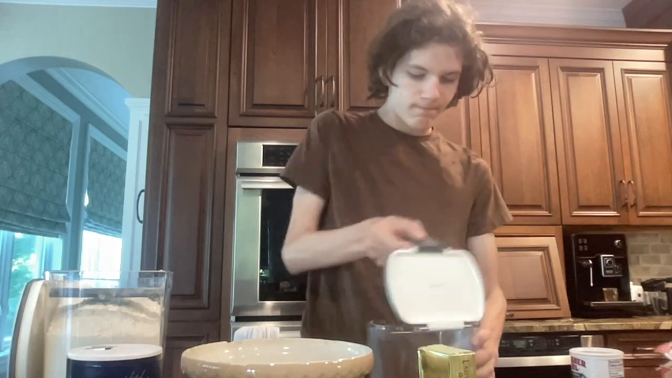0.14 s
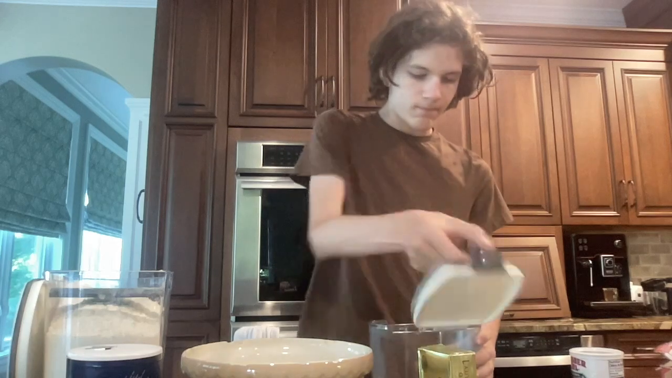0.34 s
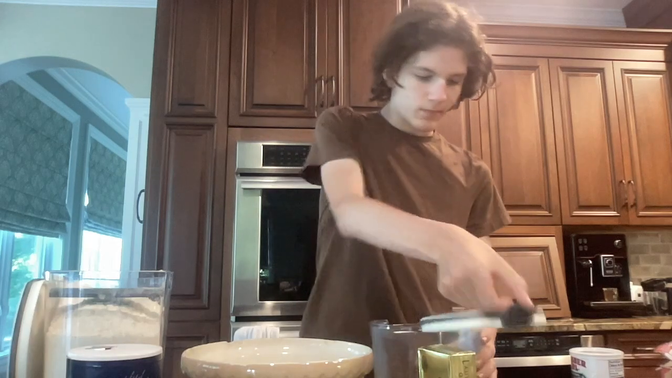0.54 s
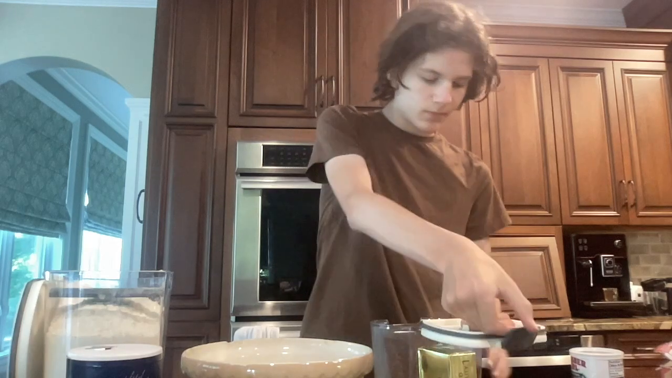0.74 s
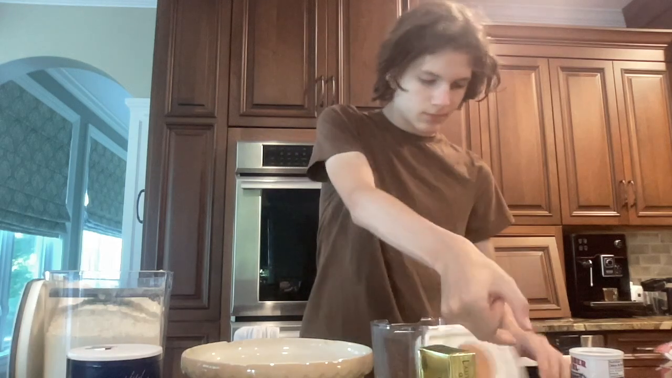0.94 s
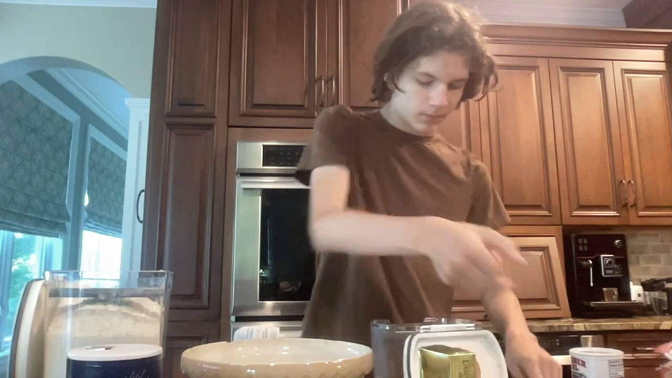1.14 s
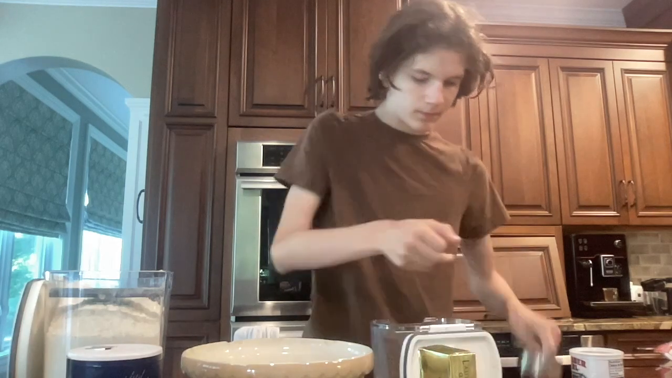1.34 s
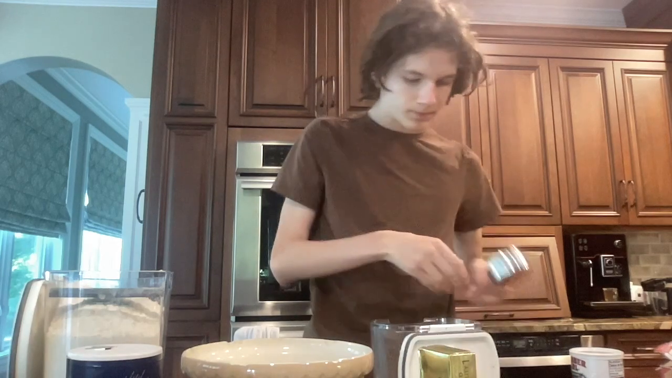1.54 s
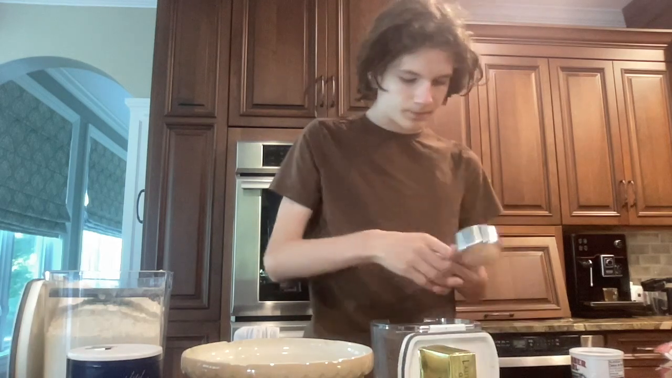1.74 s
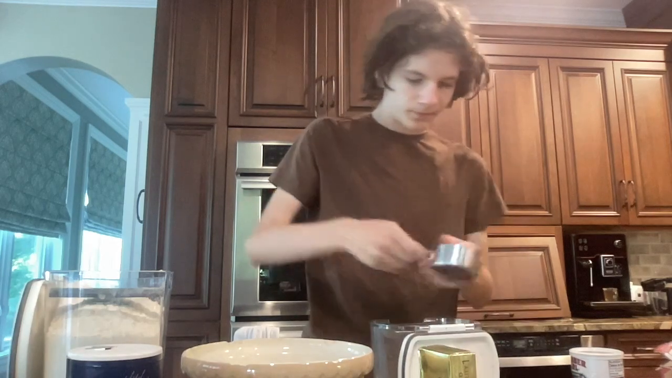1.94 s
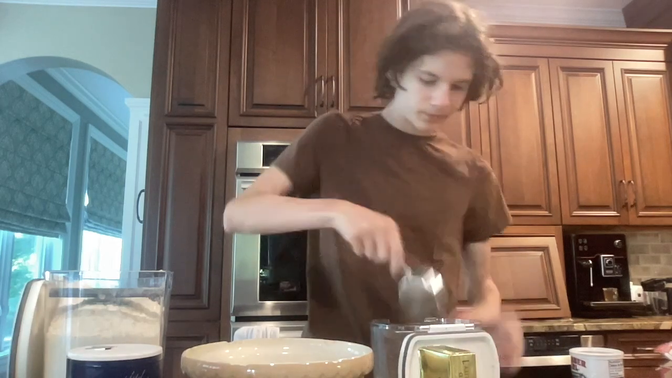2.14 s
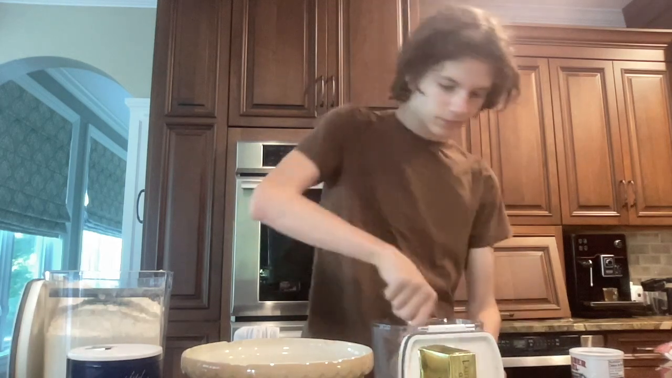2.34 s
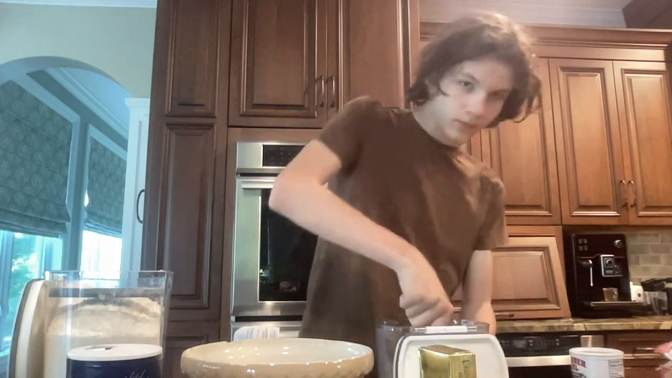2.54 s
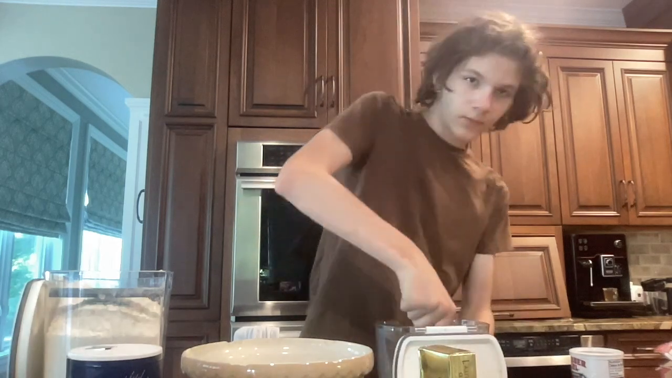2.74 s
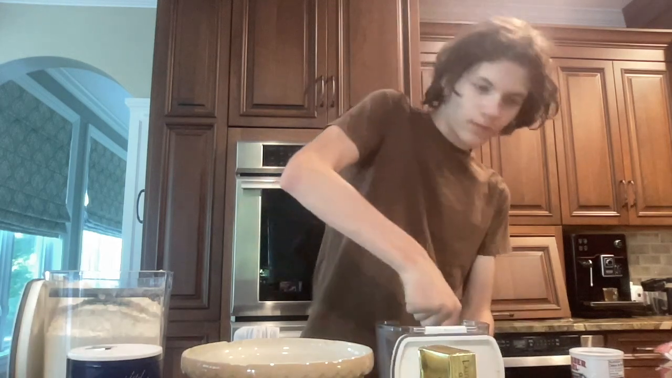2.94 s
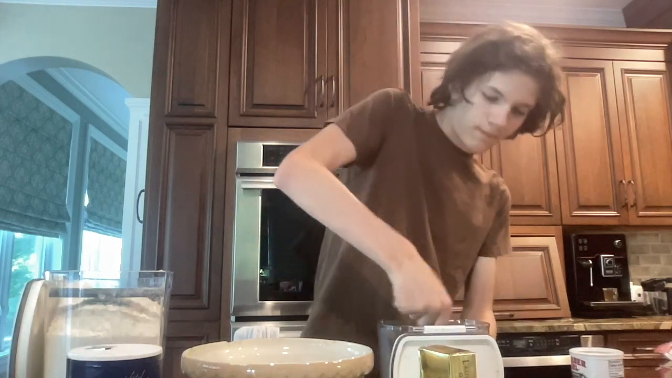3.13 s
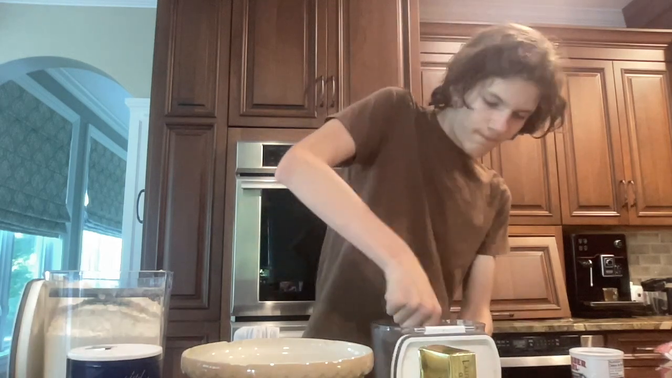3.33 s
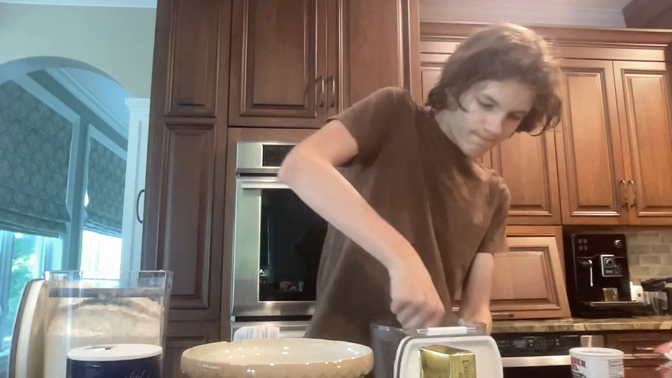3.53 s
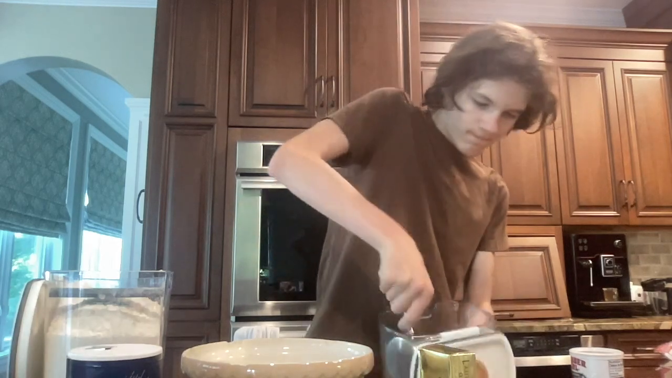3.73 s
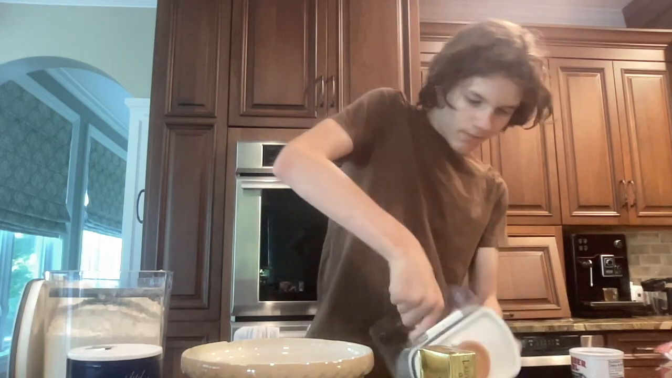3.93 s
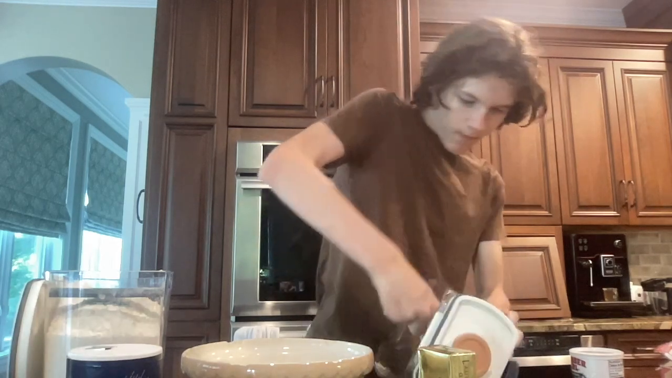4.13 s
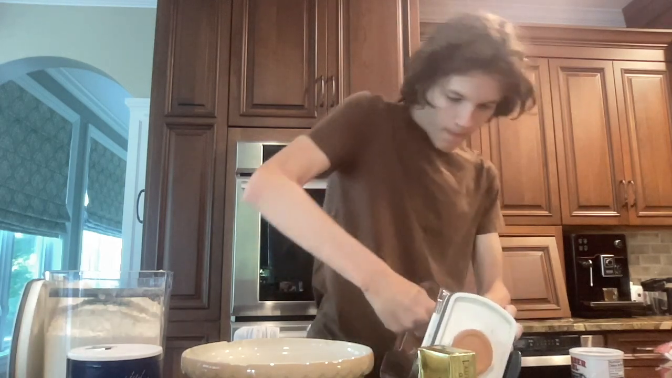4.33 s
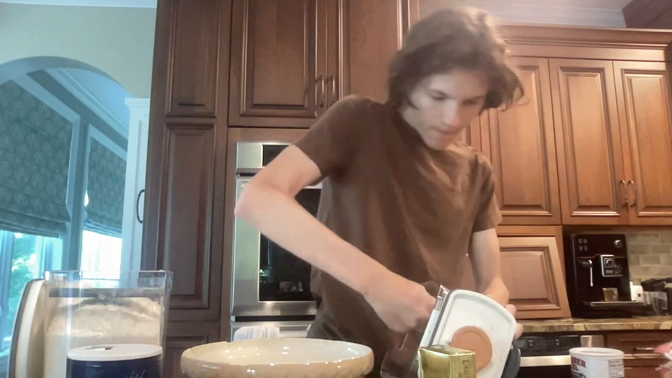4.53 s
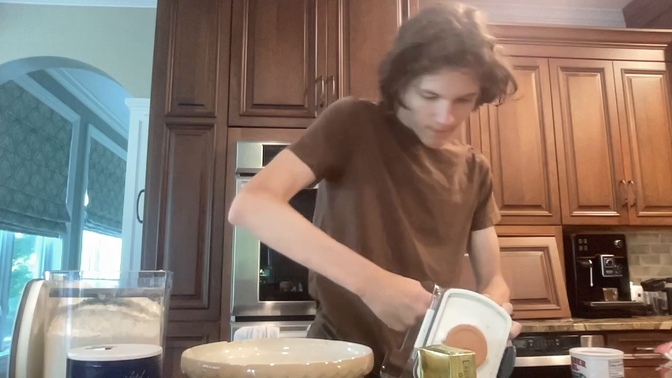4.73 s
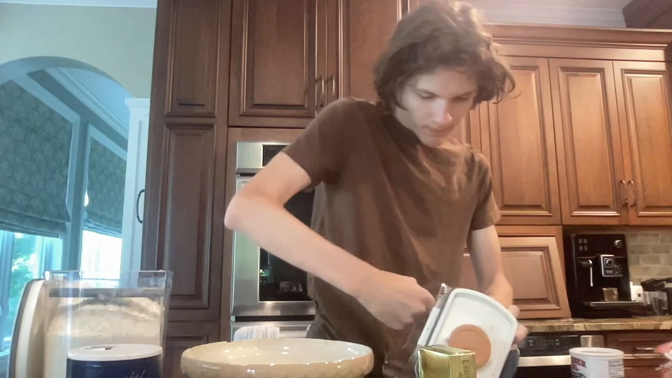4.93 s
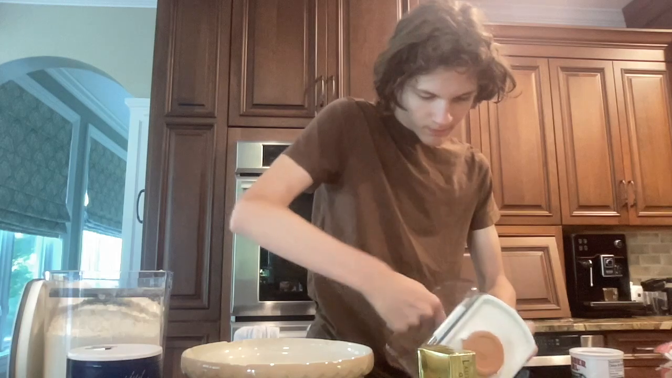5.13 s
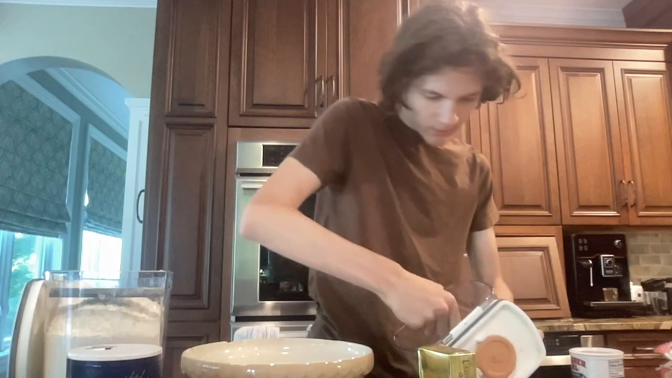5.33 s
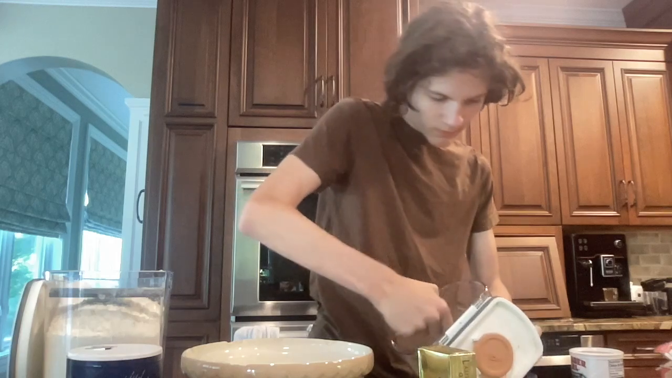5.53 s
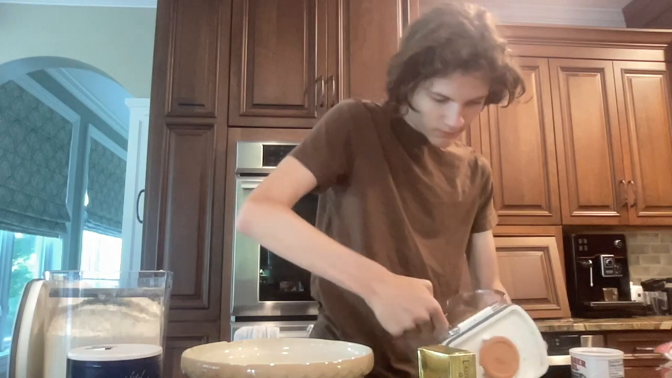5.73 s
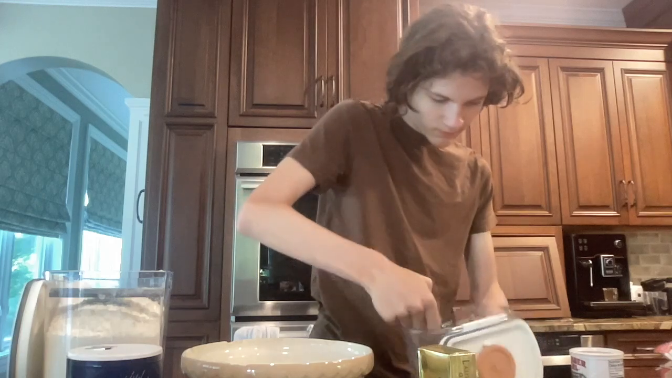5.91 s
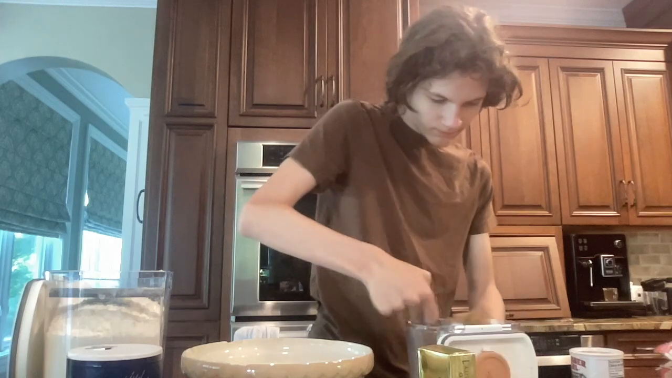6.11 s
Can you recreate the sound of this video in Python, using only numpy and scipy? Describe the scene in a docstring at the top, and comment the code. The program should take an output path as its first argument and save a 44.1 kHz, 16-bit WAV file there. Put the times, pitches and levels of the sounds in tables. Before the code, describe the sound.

Very quiet room air and a faint low hum lie beneath close handling sounds on a kitchen counter. Right at the start, a few hollow plastic knocks with a low counter thud mark the lid coming off, with another at 0.2 s and a weaker one at 0.35. After a near pause, the lid lands around 1.0-1.15 s in a rapid, loud, hard clatter, with a smaller clack at 1.37. From 1.6 to 2.15 s a steel cup clinks softly in the hand. It strikes the tub with a strong hollow knock at 2.3, then gives muted clinks and short gritty scrapes until 3.7, where a tiny high squeak and another loud knock occur. From 4 to 5.1 s sugar slides faintly in the tipped tub. Sparse small scrapes and bumps follow, ending with a heavier scrape and thunk near 6.1 s. Each impact has a short, lively room tail.

```python
"""Over still room air and faint hum, the lid is pulled off a plastic sugar tub and put down with a clatter:
noise and impulses excite wall resonances, and decaying cosines give the hollow tub and the counter.
A steel measuring cup then rattles in the hand, knocks into the tub, squeaks as a wavering sine and scrapes
through the sugar as filtered grains; the tub is tipped, the sugar slides, and the tub is set back.
A lively kitchen answers with surface echoes and a diffuse tail of decaying noise."""
import sys
import numpy as np
from scipy import signal
from scipy.fft import rfft, irfft, next_fast_len
from scipy.io import wavfile
from scipy.ndimage import map_coordinates

SR = 44100
rng = np.random.default_rng(int(sys.argv[2]) if len(sys.argv) > 2 else 0)


def persist_wave(psi):
    """Save psi, clipped to +-1, as 16-bit WAV."""
    counts = np.round(np.clip(psi, -1, 1) * 32767).astype(np.int16)
    wavfile.write(sys.argv[1], SR, np.atleast_2d(counts).T)


N = 272097

# Spectrum of still room air. Each row: frequency in Hz, relative level in dB.
AIR_SPECTRUM = [(25, -4), (60, -5), (130, -5.5), (220, -9), (450, -5.5), (700, -19.5), (1200, -31.5),
                (2200, -27.5), (4000, -36), (8000, -38.5), (11000, -43.5), (16000, -46)]

# Scraping strokes of cup and tub. Each row: centre in seconds, half length in seconds,
# pressure in dB, bite (extra grit) in dB.
STROKES = [(0.0, 0.021, -51.5, 3), (1.273, 0.011, -53, 15.5), (1.874, 0.015, -73, 6),
           (1.97, 0.017, -70, 2.5), (2.771, 0.043, -55, -2), (2.86, 0.025, -54, 13.5),
           (3.004, 0.041, -55, -10), (3.113, 0.038, -54.5, -1), (3.29, 0.063, -61.5, -1),
           (3.662, 0.055, -53, 1.5), (4.226, .025, -64.5, 13), (4.486, .03, -63, 9.5),
           (5.194, 0.026, -55.5, 3), (5.31, 0.019, -75.5, 25), (5.41, .035, -66, -3),
           (5.658, 0.023, -65, 15.5), (5.93, 0.12, -70, -6.5), (6.095, 0.032, -31.5, -6)]
# Sugar sliding in the tipped tub. Each row: time in seconds, flow in dB.
SUGAR_FLOW = [(4.0, -67), (4.08, -68), (4.492, -62.5), (4.53, -68), (4.722, -71), (4.826, -80.5),
              (4.836, -86), (5.032, -72.5), (5.12, -88)]
# Levels over the sugar flow. One row: rub, crunch, hiss and rim, all in dB.
FLOW_MIX_DB = [5.5, -1, -20, -16.5]
# Spectra of the low rub, coarse crunch and fine hiss. Each row: frequency in Hz, relative level in dB.
RUB_SPECTRUM = [(60, -12.5), (130, -1.5), (250, -9), (400, -7.5), (520, 4), (700, -9), (1100, -28),
                (3000, -57)]
CRUNCH_SPECTRUM = [(300, -17), (700, 1), (1300, 3.5), (2000, -2.5), (2700, -12.5), (4000, -13.5),
                   (6500, -21.5), (12000, -43)]
HISS_SPECTRUM = [(1500, -22.5), (3000, -4), (4000, 0), (5600, -6.5), (7400, 0.5), (9500, -12),
                 (14000, -9.5), (16000, -14)]
# Resonances of the cup's rim. Each row: centre in Hz, width in Hz, relative level in dB.
RIM_RESONANCES = [(1950, 410, 9), (3850, 78, 5), (5840, 110, -8), (7160, 70, -4.5), (8700, 40, -3),
                  (10700, 83, -15), (12100, 60, -3.5), (13400, 80, -16.5)]

# Blows on tub and lid. Each row: start in seconds, hollow knock in dB, hardness (clack over knock) in dB,
# weight (counter thud over knock) in dB, knock pitch in Hz, clack centre in Hz.
BLOWS = [(0.039, -27.5, -14, -14.5, 484, 2320), (0.0435, -18.5, -15, -1.5, 387, 2320),
         (0.0495, -22.5, -30, -9.5, 574, 1720), (0.2055, -23.5, -14.5, -7, 410, 2060),
         (0.345, -38.5, -19.5, -21, 475, 1200), (0.526, -61, -3, -4.5, 476, 1190),
         (0.68, -58, -27.5, -13.5, 451, 906), (0.91, -46, -10, -10.5, 559, 1720),
         (0.94, -41.5, -19, -13.5, 557, 1800), (0.967, -55.5, -4, -7.5, 623, 1500),
         (1.023, -16.5, -3, -19.5, 556, 1453), (1.035, -14.5, -1, -18, 506, 3300),
         (1.065, -28.5, -5.5, 2.5, 560, 2000), (1.078, -16.5, -16, -3, 524, 1306),
         (1.1145, -23.5, -1.5, -8, 536, 1640), (1.142, -28, -31, -3.5, 529, 1490),
         (1.3655, -31, 0.5, -23, 496, 1680), (2.307, -17, -4.5, -22, 544.5, 1900),
         (3.019, -43.5, -18, -23, 580, 1020), (3.245, -55, -31, -8, 524, 1100),
         (3.4295, -55, 9.5, -5, 500, 1498), (3.463, -45, -12.5, -8, 525, 2000),
         (3.731, -15.5, -11.5, -21.5, 530.4, 2900), (3.75, -45.5, 7, -10, 557, 1800),
         (3.865, -37.5, -16, -15, 477, 1690), (3.981, -47.5, -17.5, -5, 479, 1490),
         (5.169, -39, -34.5, -12.5, 505, 1100), (5.755, -58, -14.5, 1, 543, 1300),
         (6.021, -44.5, -16.5, 3, 490, 1085), (6.05, -35.5, -10, -16.5, 447, 1600),
         (6.091, -19.5, -14.5, -5.5, 441, 1920)]
# Modes of the counter and of the tub. Each row: frequency in Hz before any stretch,
# relative level in dB before scatter, decay by 60 dB in seconds.
COUNTER_MODES = [(62, -5.5, 0.42), (122.5, -4.5, 0.38), (143, -6.5, .22), (223, -6, 0.044), (267, 0, .04),
                 (328.4, 6.5, .06)]
TUB_MODES = [(393, -14, 0.027), (522.7, 3, 0.046), (583, -5.5, .07), (648, -7.5, 0.036),
             (770.5, -14.5, 0.05)]
# Resonances of the plastic walls. Each row: centre in Hz, width in Hz,
# relative level in dB before the place of the blow weights it.
WALL_RESONANCES = [(814, 260, -1), (1152, 160, 7.5), (1383, 400, 3.5), (1950, 450, 0.5), (2700, 600, -3),
                   (3820, 650, -3), (4850, 1300, -10)]
# Spectrum of the crack of a hard contact. Each row: frequency in Hz, relative level in dB.
CRACK_SPECTRUM = [(2000, -31.5), (4500, -5.5), (6300, -2), (8000, 3.5), (9500, -6), (13000, -6.5),
                  (16000, -12)]

# Rattles of the steel cup. Each row: time of the hit in seconds, clink in dB,
# hollow knock over clink in dB, brightness (shared by edge and handle ring, before their offsets) in dB.
RATTLES = [(1.578, -48, 5.5, -8), (1.789, -50, 5, -4.5), (1.977, -52.5, 5, -5.5), (2.144, -55.5, 4, -5.5),
           (2.447, -43.5, 3, 2), (2.732, -41.5, 1, -8), (2.956, -45.5, 3, -6.5), (3.563, -48.5, 0, -9),
           (3.61, -60.5, 14, -7), (3.633, -54, -3, -11.5), (3.688, -60.5, 14, -18.5)]
# Modes of the cup's handle. Each row: frequency in Hz, relative level in dB before scatter,
# decay by 60 dB in seconds.
HANDLE_MODES = [(4820, -17, 0.27), (4860, 7.5, 0.042), (5020, -6.5, 0.087), (6160, -7.5, 0.015),
                (7200, -10, .02), (7970, -2.5, 0.027), (8500, -2, 0.055)]
# Resonances of the hand-held cup, and of the palm it thumps. Each row: centre in Hz, width in Hz,
# relative level in dB.
CUP_RESONANCES = [(1310, 200, -3.5), (1865, 320, -1.5), (2370, 150, -4.5), (2946, 120, -12),
                  (3920, 100, -12.5)]
PALM_RESONANCE = [(143, 130, 0)]
# Spectrum of the clink's bright edge. Each row: frequency in Hz, relative level in dB.
EDGE_SPECTRUM = [(2500, -26.5), (4500, 3), (8300, 0), (9500, -13), (13000, -18), (16000, -32)]

# Squeaks of the cup along the tub wall. Each row: centre in seconds, half length in seconds,
# mean pitch in Hz, level in dB before stutter.
SQUEAKS = [(3.568, .004, 4930, -56), (3.642, 0.019, 5050, -73.5), (3.706, 0.014, 5050, -62.5)]

# Reverberation of the kitchen. Each row: frequency in Hz, decay by 60 dB in seconds.
ROOM_T60 = [(60, .5), (200, 0.97), (500, 0.5735), (2000, 0.66), (6000, 0.56), (10000, 0.32), (16000, 0.42)]
# Strength of its tail. Each row: frequency in Hz, tail level in dB before each source's wet level.
ROOM_DB = [(60, -5), (130, 2), (250, -4.5), (400, -9.5), (600, -6), (2000, -9.5), (8000, -4), (16000, -4.5)]
# Near reflecting surfaces. Each row: delay in seconds, echo level in dB.
SURFACES = [(.0031, -19.5), (.0082, -16), (0.0181, -17), (0.0259, -18)]

TOP_HZ = 16000  # band limit of the recorder
LOW_HZ = 40  # lowest frequency of the handling sounds; deeper bass is cut away
RING_SIZE = SR // 3  # samples in which a struck object dies away
TAP = signal.unit_impulse(SR // 20, SR // 1000)  # an even push on all frequencies, as the room hears a contact

CRUNCH_DB, HISS_DB, RIM_DB = -11.5, -23.5, -7.5  # over the pressure of a stroke
BITE_SHARE = 0.4  # bite goes fully into the hiss, and by this share into crunch and rim
FULL_S, FILLING_S, FULL_RIM_DB = 3.37, 0.31, -17  # the cup fills up, and the sugar damps its rim

TUB_HZ = 530.8  # knock pitch at which the tub modes are not stretched
REBOUND_S, REBOUND_DB = 0.0095, -14  # every blow touches down once more
# A stiffer spot clacks higher and cracks more.
CRACK_DB, CRACK_DB_PER_OCTAVE, CRACK_FROM_HZ = -6.5, 6, 1600
CRACK_PER_WEIGHT = 0.37  # dB per dB: a blow backed by the counter cracks harder too

DIG_S = 2.3  # from here on the cup is inside the tub
DIG_DAMP_DB = -11.5  # where the sugar cushions its fall
# Held loosely, the cup falls back with a softer, duller clink.
FALLBACK_S, FALLBACK_DB, FALLBACK_RING_DB = 0.037, -5, -7


def amp(db):
    """Decibel law: convert a level in dB to a gain."""
    return 10 ** (np.asarray(db) / 20)


def unit(x):
    """Power normalisation: scale to rms 1."""
    return x / np.sqrt(np.mean(x ** 2) + 1e-20)


def along(points, hz):
    """Logarithmic pitch scale: read (Hz, value) points on a log axis."""
    f, v = np.transpose(points)
    return np.interp(np.log(hz + 1), np.log(f + 1), v)


def filtered(x, response):
    """Convolution theorem: multiply the spectrum of x by a frequency response."""
    size = next_fast_len(len(x) + SR // 20)
    hz = np.fft.rfftfreq(size, 1 / SR)
    return irfft(rfft(x, size) * response(hz), size)[:len(x)]


def coloured(x, spectrum):
    """Spectral shaping: weight x by a (Hz, dB) spectrum."""
    return filtered(x, lambda hz: amp(along(spectrum, hz)))


def resonate(x, peaks):
    """Superposition of damped resonators, with alternating sign from one to the next."""
    def response(hz):
        total = 0
        for k, (centre, width, db) in enumerate(peaks):
            damping = 1j * hz * width
            total = total + (-1) ** k * amp(db) * damping / (centre * centre - hz * hz + damping)
        return total
    return filtered(x, response)


def burst(t60):
    """Rough contact of two hard things: noise under a fast exponential decay."""
    t = np.arange(SR // 20) / SR
    return rng.standard_normal(len(t)) * 1000 ** (-t / t60)


def ring(modes, stretch, scatter_db, attack=0.001):
    """Modal vibration: decaying cosines, each at a new strength, swelling while the contact lasts."""
    t = np.arange(RING_SIZE) / SR
    tones = np.zeros(RING_SIZE)
    for hz, db, t60 in modes:
        strength = amp(db + scatter_db * rng.normal())
        tones += strength * 1000 ** (-t / t60) * np.cos(2 * np.pi * hz * stretch * t)
    return tones * (1 - np.exp(-t / attack))


def blow(x, db):
    """Impact energy: scale a short sound to the energy of 10 ms at this rms level."""
    scaled = amp(db) * x * np.sqrt(SR / 100 / np.sum(x ** 2))
    return np.pad(scaled, (0, RING_SIZE - len(x)))


def add(track, s, x):
    """Linear superposition: mix x into the track at time s."""
    part = track[max(round(s * SR), 0):][:len(x)]
    part += x[:len(part)]


def grains(rate, spread_db):
    """Granular excitation: a random stream of tiny clicks of uneven size, rms 1."""
    hits = rng.random(N) < rate / SR
    sizes = rng.standard_normal(N) * amp(spread_db * rng.standard_normal(N))
    return unit(hits * sizes)


def wobble(rate):
    """Slow fluctuation: a smooth random curve with rate knots a second."""
    knots = rng.standard_normal(int(N * rate / SR) + 4)
    return map_coordinates(knots, [np.arange(N) * rate / SR])


def swell(s, half_s):
    """Gaussian envelope: a smooth rise and fall around time s."""
    distance = (np.arange(N) / SR - s) / half_s
    return np.exp(-0.5 * np.minimum(distance ** 2, 200))


def room_tails(count, build=0.0027):
    """Diffuse reverberation for several places: noise in which each frequency dies at its own speed."""
    noise = rng.standard_normal((count, SR * 3 // 4))
    hz, t, bands = signal.stft(noise, SR, nperseg=256)
    t60 = along(ROOM_T60, hz)[:, None]
    equal_energy = np.sqrt(2 * np.log(1000) / t60 / SR)  # a long decay is no stronger in total
    fade = 1000 ** (-t / t60) * equal_energy
    level = amp(along(ROOM_DB, hz))[:, None]
    tails = signal.istft(bands * fade * level, SR, nperseg=256)[1]
    return tails * (1 - np.exp(-np.arange(tails.shape[1]) / SR / build))


def kitchen(near, far, tail, wet_db):
    """Room response: direct sound, its surface echoes, and the tail of what is radiated elsewhere."""
    out = amp(wet_db) * signal.fftconvolve(far, tail)
    add(out, 0, near)
    for delay, db in SURFACES:
        add(out, delay, amp(db) * near)
    return out


def background(level_db=-70, hum_db=-79, hum_hz=120):
    """Stationary noise and a pure tone: still room air and the faint mains hum of an appliance."""
    hum = np.sqrt(2) * np.sin(2 * np.pi * hum_hz * np.arange(N) / SR)
    air = unit(coloured(rng.standard_normal(N), AIR_SPECTRUM))
    return amp(level_db) * air + amp(hum_db) * hum


def friction_gains():
    """Addition of powers: gains of rub, crunch, hiss and rim from the sliding sugar and the strokes."""
    t = np.arange(N) / SR
    flow_db = np.interp(t, *np.transpose(SUGAR_FLOW), left=-np.inf, right=-np.inf)
    power = np.outer(amp(FLOW_MIX_DB), amp(flow_db)) ** 2
    for s, half_s, pressure_db, bite_db in STROKES:
        fill = np.clip(1 + (s - FULL_S) / FILLING_S, 0, 1)
        grit_db = BITE_SHARE * bite_db
        rim_db = RIM_DB + grit_db + FULL_RIM_DB * fill
        mix_db = np.array([0, CRUNCH_DB + grit_db, HISS_DB + bite_db, rim_db])
        power += np.outer(amp(pressure_db + mix_db), swell(s, half_s)) ** 2
    return np.sqrt(power)


def scrapes_and_sugar(tail):
    """Granular friction: uneven slips crunch and hiss, rumble in the tub and make the cup's rim sing."""
    rub, crunch, hiss, drag = friction_gains()
    body = rub * unit(coloured(grains(rate=900, spread_db=2), RUB_SPECTRUM))
    coarse = crunch * unit(coloured(grains(rate=2500, spread_db=0.5), CRUNCH_SPECTRUM))
    fine = hiss * unit(coloured(grains(rate=7500, spread_db=6.0), HISS_SPECTRUM))
    rim = drag * unit(resonate(grains(rate=6700, spread_db=1.0), RIM_RESONANCES))
    flutter = amp(2.4 * wobble(45))
    sound = flutter * (body + coarse + fine + rim)
    return kitchen(sound, sound, tail, wet_db=-0.2)[:N]


def plastic(force, clack_db, centre_hz, crack_db, fall_db):
    """Place-dependent excitation: resonances near centre_hz clack most, and the contact itself cracks."""
    walls = []
    for hz, width, db in WALL_RESONANCES:
        octaves_away = abs(np.log2(hz / centre_hz))
        walls.append((hz, width, db - fall_db * octaves_away))
    clack = blow(resonate(force, walls), clack_db)
    return clack + blow(coloured(force, CRACK_SPECTRUM), crack_db)


def tub(tails, room_clack_db=-0.9):
    """Impact on coupled bodies: plastic clacks, hollow tub knocks, counter thuds, and one rebound follows."""
    out = np.zeros(N)
    for k, (s, knock_db, hardness_db, weight_db, knock_hz, centre_hz) in enumerate(BLOWS):
        tail = tails[k % len(tails)]
        clack_db = knock_db + hardness_db
        stiffness_db = CRACK_DB_PER_OCTAVE * np.log2(centre_hz / CRACK_FROM_HZ)
        crack_db = clack_db + CRACK_DB + stiffness_db + CRACK_PER_WEIGHT * weight_db
        knock = blow(ring(TUB_MODES, knock_hz / TUB_HZ, scatter_db=3.0), knock_db)
        thud = blow(ring(COUNTER_MODES, 1, scatter_db=4, attack=0.003), knock_db + weight_db)
        body = knock + thud
        near = plastic(burst(t60=0.02), clack_db, centre_hz, crack_db, fall_db=5.5)
        # The room hears all faces of the tub at once.
        far = plastic(TAP, clack_db + room_clack_db, centre_hz, crack_db, fall_db=5)
        add(out, s, kitchen(body + near, body + far, tail, wet_db=-1.5))
        second_clack = plastic(burst(t60=0.019), clack_db, centre_hz, crack_db, fall_db=6.5)
        add(out, s + REBOUND_S, amp(REBOUND_DB) * (knock + second_clack))
    return out


def steel(force, clink_db, ring_db):
    """Damped metal impact: a dull clink of the hand-held cup with a bright edge."""
    dull = blow(resonate(force, CUP_RESONANCES), clink_db)
    return dull + blow(coloured(force, EDGE_SPECTRUM), ring_db - 4.5)


def clink(tail, clink_db, knock_db, ring_db):
    """Selective damping: the hand shortens the cup's clink and only its handle rings on; the tub knocks."""
    handle = blow(ring(HANDLE_MODES, 1, scatter_db=2.5), ring_db - 5.0)
    knock = blow(ring(TUB_MODES, 0.93, scatter_db=8.0, attack=0.00046), knock_db)
    body = handle + knock
    near = steel(burst(t60=0.019), clink_db, ring_db)
    far = steel(TAP, clink_db, ring_db)
    return kitchen(body + near, body + far, tail, wet_db=-3.5)


def cup(tails, lead_s=0.0081, lead_db=-13, fallback_knock_db=4, thump_db=-5):
    """Repeated impact: the cup grazes, hits and falls back; in the hand it also thumps the palm."""
    out = np.zeros(N)
    for k, (s, db, knock_db, ring_db) in enumerate(RATTLES):
        tail, next_tail = tails[k % len(tails)], tails[(k + 1) % len(tails)]
        graze = blow(resonate(burst(t60=0.028), CUP_RESONANCES), db + lead_db)
        add(out, s - lead_s, graze)
        add(out, s, clink(tail, db, db + knock_db, db + ring_db))
        back_db = db + FALLBACK_DB + DIG_DAMP_DB * (s > DIG_S)
        back_knock_db = back_db + knock_db + fallback_knock_db
        back_ring_db = back_db + ring_db + FALLBACK_RING_DB
        add(out, s + FALLBACK_S, clink(next_tail, back_db, back_knock_db, back_ring_db))
        if s < DIG_S:
            soft = resonate(resonate(burst(t60=0.088), PALM_RESONANCE), PALM_RESONANCE)
            thump = blow(soft, db + thump_db)
            add(out, s, kitchen(thump, thump, tail, wet_db=8))
    return out


def squeak(tail, waver=0.019, stutter_db=4):
    """Stick-slip as the cup is levered up along the plastic: a sine of wavering pitch and stuttering level."""
    phase = 2 * np.pi * np.cumsum(1 + waver * wobble(400)) / SR  # per Hz of pitch
    slips = np.zeros(N)
    for s, half_s, hz, db in SQUEAKS:
        slips += amp(db) * swell(s, half_s) * np.sqrt(2) * np.sin(hz * phase)
    tone = slips * amp(stutter_db * wobble(92))
    return kitchen(tone, tone, tail, wet_db=-1)[:N]


def scene():
    """Superposition at one microphone on the counter; the handling sounds carry no deep bass below LOW_HZ."""
    tails = room_tails(count=9)
    handling = scrapes_and_sugar(tails[0]) + tub(tails) + cup(tails) + squeak(tails[1])
    bass_cut = signal.butter(4, LOW_HZ, "high", fs=SR, output="sos")
    handling = signal.sosfilt(bass_cut, handling)
    return (handling + background())[None]


def record(dry, top=0.9):
    """Saturation and band limiting: the highest peaks are gently rounded off, and the recorder cuts steeply at
    TOP_HZ."""
    rounded = dry / (1 + np.abs(dry / top) ** 8) ** (1 / 8)

    def band_limit(hz):
        return 1 / np.sqrt(1 + (hz / TOP_HZ) ** 160)
    return np.array([filtered(channel, band_limit) for channel in rounded])


dry = scene()
out = record(dry)
persist_wave(out)
```